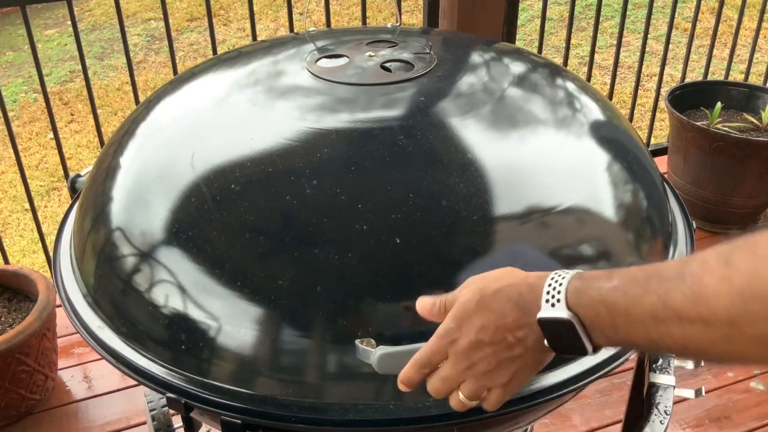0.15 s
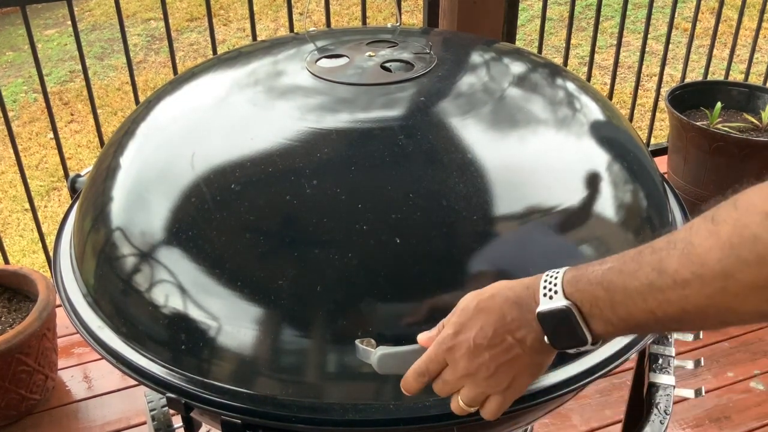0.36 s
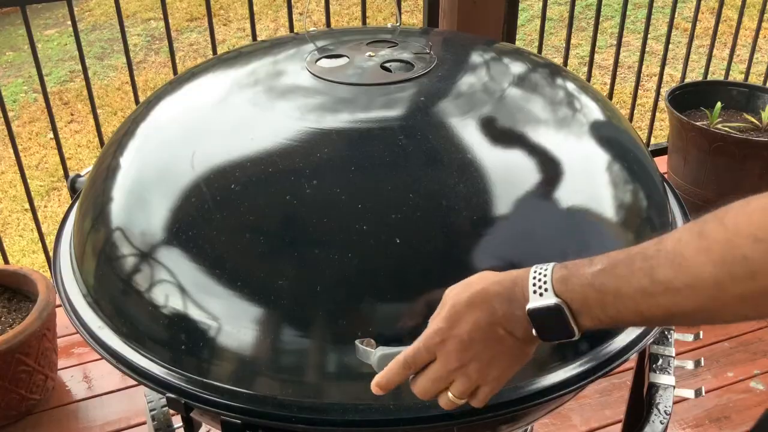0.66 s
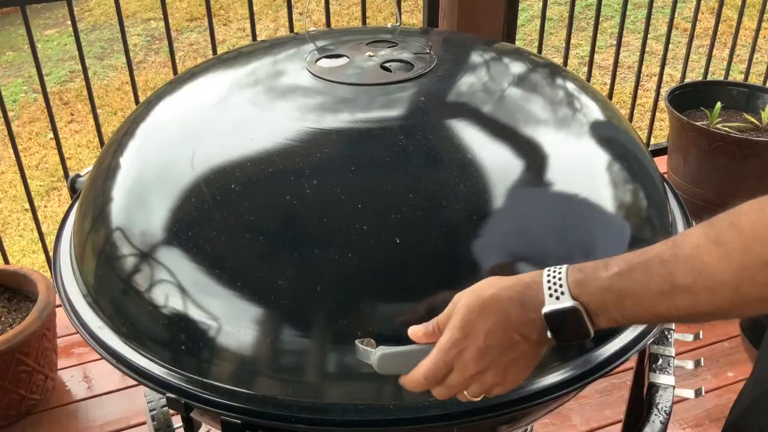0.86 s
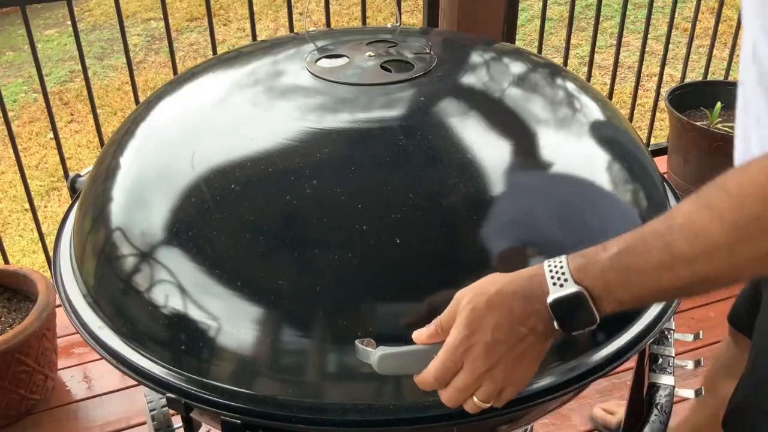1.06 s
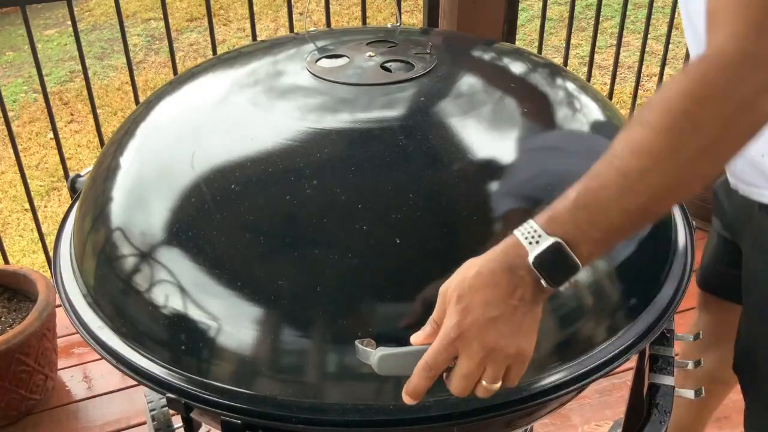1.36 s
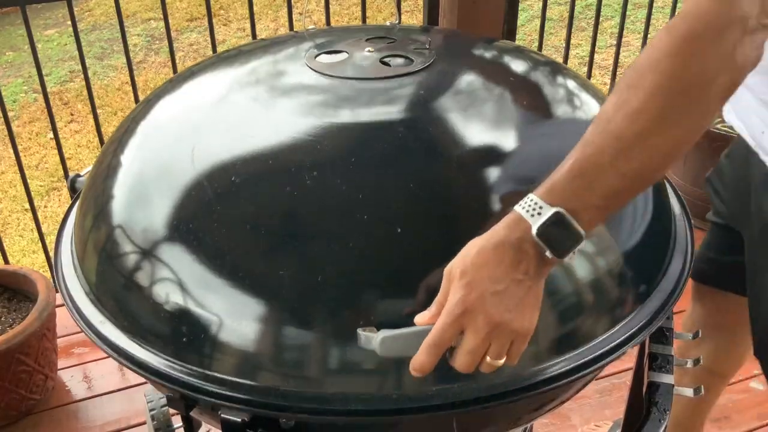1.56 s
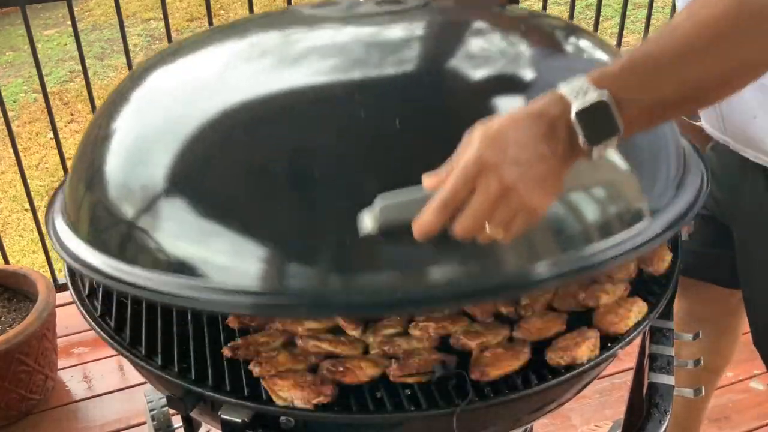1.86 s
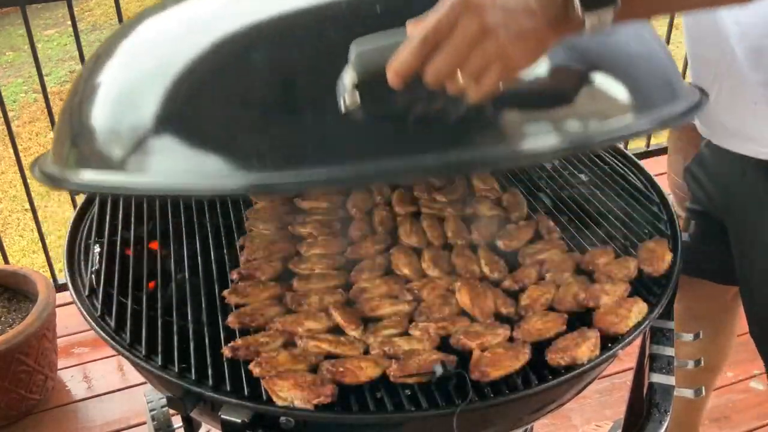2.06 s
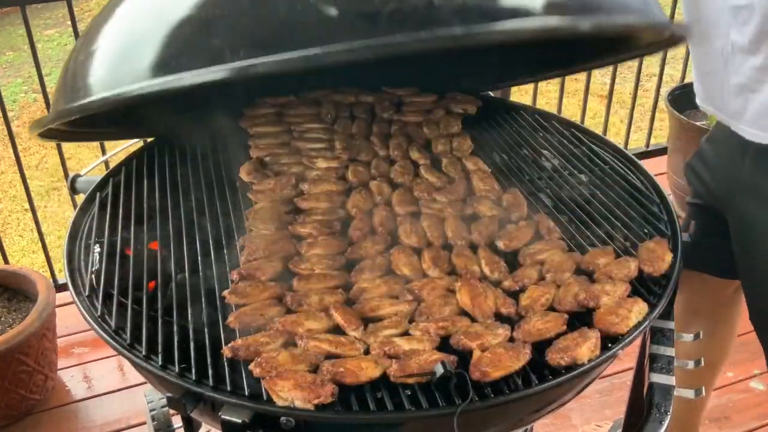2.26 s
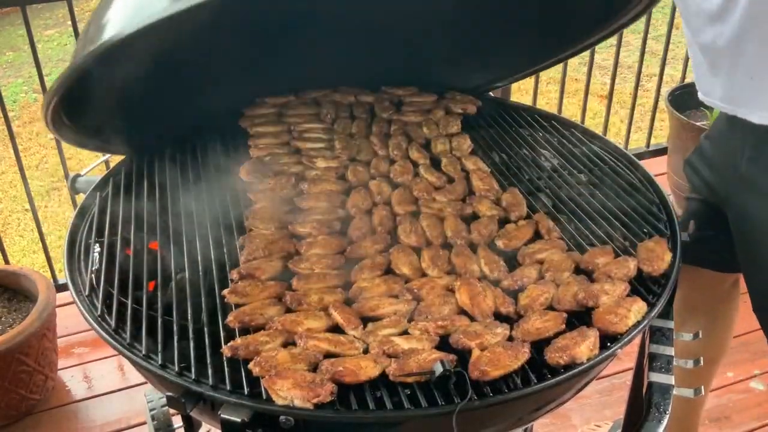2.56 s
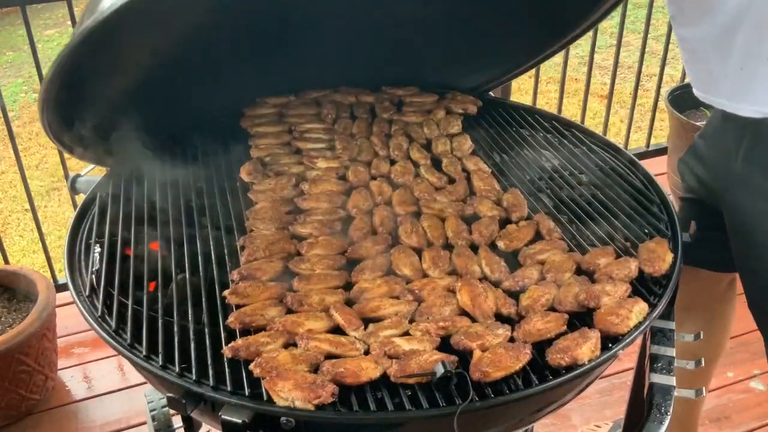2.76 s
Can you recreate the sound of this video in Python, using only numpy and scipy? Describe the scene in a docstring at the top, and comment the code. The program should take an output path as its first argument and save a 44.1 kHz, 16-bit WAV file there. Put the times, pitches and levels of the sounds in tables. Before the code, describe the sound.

A heavy enameled steel grill lid is lifted, clanking loudly twice and scraping on its rim outdoors

```python
"""The enamelled steel lid of a grill, swung open by a hand on its handle, is a sum of decaying modes.
Skin and cloth rub as friction noise and small parts tick as short noise bursts; then the lid clanks
twice on the bowl and slides on its rim, where friction feeds its modes.
Soft rain on a wet deck is filtered random noise: hiss over a low rumble. A stereo widening delays
the left channel in the treble and adds a diffuse part; the strongest peaks are clipped."""
import sys
import numpy as np
from scipy import signal
from scipy.fft import rfft, irfft, next_fast_len
from scipy.io import wavfile
from scipy.ndimage import uniform_filter1d

SR = 44100
rng = np.random.default_rng(int(sys.argv[2]) if len(sys.argv) > 2 else 0)


def natural_amplitude(level_db):
    """Convert a level in decibels to a linear amplitude factor, elementwise."""
    exponent = np.asarray(level_db, float) / 20
    return 10 ** exponent


def log_audio(samples):
    """Write samples as a 16-bit WAV file to the path given in sys.argv[1]."""
    # one column per channel
    frames = np.atleast_2d(samples).T
    # limit to full scale, then quantise
    limited = np.clip(frames, -1, 1)
    pcm = np.round(limited * 32767).astype(np.int16)
    wavfile.write(sys.argv[1], SR, pcm)


N = 127890  # samples

# Spectrum of the rain noise. Each row: frequency in Hz, relative density in dB per Hz.
RAIN_SPECTRUM = [(15, -18), (25, 4.5), (130, 2.5), (193, -14.5), (320, -9.5), (400, -18), (490, -14),
                 (1220, -23.5), (2820, -24), (3600, -30), (7700, -32), (10200, -36.5), (13000, -25),
                 (16000, -30.5)]
RAIN_DB, PATCHY_DB = -40, 1.1  # rms level; rms of its drift over time and frequency

# Bright ticks of small parts. Each row: start in seconds, level in dB, decay time t60 in seconds,
# spectral tilt in dB per octave.
TICK_EVENTS = [(0.0676, -38, 0.62, -1.5), (0.153, -31.5, 0.026, -5), (0.209, -35, 0.16, -5),
               (0.3587, -30, .03, 12), (0.5604, -32.5, 0.68, -1.5), (.6905, -36, .012, 6),
               (1.002, -42, 0.25, -0.5), (1.092, -36, 0.24, 8.5), (1.166, -34, 0.11, 13),
               (1.3181, -11, 0.012, -3), (1.321, -22, 0.2, -3), (1.614, -20.5, 0.21, 3),
               (1.6195, 3.5, 0.083, 23), (1.805, -44.5, 0.2, -4.5), (1.975, -39, 0.067, 2),
               (2.1938, -27, .3, 0.5), (2.2148, -11, 0.23, 9.5), (2.4889, -10, .1, 1),
               (2.579, -15, 0.13, 5)]
TICK_RISE_S, TICK_LOW_HZ = .0007, 1330

# Rubs of skin, cloth and rim. Each row: peak time in seconds, rise in seconds, fall in seconds,
# level in dB, spectral tilt in dB per octave.
RUB_STROKES = [(.15, 0.032, 0.072, -40, -1.4), (0.214, 0.046, 0.6, -51.5, 1), (0.511, 0.042, 0.14, -50, 5),
               (0.68, 0.025, 0.04, -34, -2.5), (.81, 0.07, 0.085, -45, 0),
               (1.121, 0.034, 0.18, -48.5, -0.5), (1.3, 0.0094, 0.049, -43.5, -2.5),
               (1.434, 0.052, 0.049, -22.5, -1.53), (1.728, 0.093, 0.036, -37.5, 3.5),
               (2.048, 0.034, 0.17, -49, -7.5), (2.431, 0.11, 0.079, -37.5, 3.5),
               (2.522, 0.084, 0.058, -26.5, 3), (2.72, 0.15, 0.14, -28, 3)]
# Resonant colour of the rubs. The single row: centre in Hz, width in Hz, boost in dB.
RUB_RESONANCE = (4620, 750, 5.4)
RUB_LOW_HZ = 750
GRIT_DB, CLUMP_DB = 1, 2.8  # mean boost of single grains; rms of the slower clumping

# Low modes struck by the blows. The two lowest rows, near 35 and 55 Hz, are a dull thump of the deck beneath;
# the rest are flexing modes of the steel shell. Each row: frequency in Hz, level in dB, t60 in seconds.
SHELL_MODES = [(34.8, -28, 1), (55, -11, 0.27), (122.2, -7, 0.31), (144.5, -2.5, 0.29), (170.4, -8.5, 0.38),
               (223, -12.5, 0.34), (301.2, 6, 0.12), (344.7, -4.5, 0.18)]
# Modes of the bowl. Each row: frequency in Hz, level in dB, t60 in seconds.
BOWL_MODES = [(640, -16.5, 1), (816, -7, 0.51), (878.5, 6, 0.3), (905, -0.5, 0.39), (928, -7, 0.85),
              (1557, -3, 0.32), (1652, -6, 0.49), (2159, 0, 0.34), (2550, 6, 0.14), (2745, -7, 0.31),
              (2827, -17, 0.41)]
# Modes of the lid. Each row: frequency in Hz, level in dB, t60 in seconds.
LID_MODES = [(459.4, -1, .22), (709.4, -7.5, 0.76), (730, -16.5, 0.45), (779.5, 1.5, 0.32),
             (804, -6.5, 0.52), (835, 0.5, 0.28), (898, -4, 0.16), (987, -5, 0.15), (1098, -7.5, 0.16),
             (1517, -13, 0.17), (2007, -21, 0.27), (2720, -28, 0.27)]
# Blows on the steel, sudden or softly swelling. Each row: start in seconds, rise in seconds, then
# the levels of shell, bowl, lid and clang in dB.
STEEL_BLOWS = [(.563, 0.002, -40.5, -59, -66, -37.5), (1.002, 0.00089, -47, -69, -55, -53),
               (1.42, 0.0087, -44, -39, -39.5, -31), (1.613, 0.0028, -64, -54, -57, -28),
               (1.628, 0.0065, -50, -47, -36, -35), (1.715, 0.02, -42, -65, -41, -39.5),
               (2.206, 0.0043, -57, -58, -43, -23.5), (2.217, 0.0035, -52, -30.5, -45, -24.5),
               (2.2325, 0.0024, -3, -13.5, -29, -6.5), (2.4525, 0.002, -10.5, -17, -12.5, -9),
               (2.5, 0.0084, -11.5, -21.5, -13.5, -16), (2.54, 0.0021, -25, -49, -18, -24.5),
               (2.63, 0.038, -15, -24, -24.5, -20.5), (2.705, 0.0083, -12, -26.5, -30, -19.5),
               (2.79, 0.014, -19, -54, -43, -27), (2.86, 0.058, -13.5, -48, -4.5, -19.5)]
SHORTEST_RISE_S = .0003
# A round shell splits each mode: relative strength of the twin, and the scale of its offset.
TWIN, TWIN_HZ = .28, 14

# Dense upper modes of the steel, heard as a clang. Each row: frequency in Hz, relative level in dB per Hz.
CLANG_SPECTRUM = [(60, -62), (300, -9.5), (600, -17.5), (900, -5), (1250, -13.5), (1800, -10), (2800, -9),
                  (3600, -17.5), (6000, -24.5), (16000, -52)]
# Decay of the clang, about which single modes scatter. Each row: frequency in Hz, t60 in seconds.
CLANG_DECAY = [(200, 0.47), (900, 0.42), (2500, 0.47), (5000, 0.28), (12000, 0.29)]
CLANG_MODES = 320
UNEVEN_DB, RATTLE_DB = 5, 1.5  # scale of the mode level scatter; rms of the rattle

# Modes of the handle bracket. Each row: frequency in Hz, level in dB, t60 in seconds.
HANDLE_MODES = [(315, -19, 1.2), (815, -6, .6), (855, 0, .55), (1001, -12, .5), (1672, -4, .42),
                (2200, -3, .28), (2546, -4, .3), (2789, -7, .3)]
# Taps on the handle bracket. Each row: start in seconds, level in dB.
HANDLE_TAPS = [(1.319, -51), (1.618, -30.5), (1.712, -42)]

# The lid slides along its rim and sings; the contact place favours modes near one pitch. Each row:
# peak time in seconds, rise in seconds, fall in seconds, level in dB, favoured pitch in Hz.
RIM_SLIDES = [(2.725, 0.05, 0.03, -11.5, 788), (2.755, 0.03, 0.05, -14.5, 850),
              (2.8, 0.048, 0.061, -17, 753)]
SLIDE_WAVER = .2  # uneven friction: share of slow chance in each mode
FAVOUR_DB = 22  # loss one octave away from the favoured pitch

# Diffuse part of the widening. Each row: frequency in Hz, level against the direct part in dB.
DIFFUSE_SHARE = [(100, -16), (400, -11), (700, -6), (1500, -4.5), (3000, -4), (3600, -2.5), (8000, -3),
                 (9500, -12), (10300, -24), (15000, -30)]
# Phase of the left channel. Each row: frequency in Hz, lead over the plain lag in radians.
LEFT_LEAD = [(0, 0), (500, 2.5), (950, 4.2), (1250, 2.1), (3100, 1.7), (4000, -1.2), (7000, -2.6),
             (16000, -2.6)]
LAG_S = 35 / 44100
CLIP, EDGE_HZ = 1.0, 15800  # overload amplitude; low-pass edge


def evened(x):
    """Normalization: scales a signal to rms 1."""
    return x / np.sqrt(np.mean(x ** 2) + 1e-20)


def read(points, hz):
    """Interpolation of a spectrum on a logarithmic frequency axis."""
    f, value = np.transpose(points)
    return np.interp(np.log(hz + 1), np.log(f + 1), value)


def add(mix, s, sound):
    """Superposition: mixes a sound in at a time in seconds."""
    part = mix[round(s * SR):][:len(sound)]
    part += sound[:len(part)]


def shaped(x, gain):
    """Linear filtering: multiplies the spectrum of the last axis by a gain law."""
    size = next_fast_len(x.shape[-1] + 4096)
    spectrum = rfft(x, size) * gain(np.fft.rfftfreq(size, 1 / SR))
    return irfft(spectrum, size)[..., :x.shape[-1]]


def tilted(x, tilt_db, low_hz):
    """Spectral tilt: slopes a noise about 4 kHz, cuts its bass and sets rms 1."""
    def gain(hz):
        slope = natural_amplitude(tilt_db * np.log2(hz / 4000 + 0.037))
        return slope * hz ** 2 / (hz ** 2 + low_hz ** 2)
    return evened(shaped(x, gain))


def rain():
    """Stationary random noise: a fixed spectrum of hiss and rumble with drifting patches."""
    frames, hz = N // 256 + 5, np.fft.rfftfreq(1024, 1 / SR)
    real, imag, patches = rng.standard_normal((frames, 513, 3)).T
    patches = uniform_filter1d(patches, size=12, axis=0)
    patches = evened(uniform_filter1d(patches, size=12, axis=1))
    level_db = read(RAIN_SPECTRUM, hz)[:, None] + PATCHY_DB * patches
    z = (real + 1j * imag) * natural_amplitude(level_db)
    return natural_amplitude(RAIN_DB) * evened(signal.istft(z, nperseg=1024, noverlap=768)[1][:N])


def ticks():
    """Impulsive excitation: a sudden bright crack with an exponentially dying, fizzy tail."""
    out, t = np.zeros(N), np.arange(SR // 4) / SR
    for s, db, t60, tilt_db in TICK_EVENTS:
        envelope = np.minimum(t / TICK_RISE_S, 1) * natural_amplitude(db - 60 * t / t60)
        add(out, s, envelope * tilted(rng.standard_normal(len(t)), tilt_db, TICK_LOW_HZ))
    return out


def rubs():
    """Dry friction: gritty, clumped noise under a bell-shaped stroke."""
    out, t = np.zeros(N), np.arange(-SR // 4, SR // 4) / SR
    for s, rise, fall, db, tilt_db in RUB_STROKES:
        grit = rng.standard_normal(len(t)) * natural_amplitude(GRIT_DB * rng.exponential(1, len(t)))
        clumps = evened(uniform_filter1d(rng.standard_normal(len(t)), size=130))
        grit *= natural_amplitude(CLUMP_DB * clumps)
        bell = np.exp(-(t / np.where(t < 0, rise, fall)) ** 2)
        stroke = natural_amplitude(db) * bell * tilted(grit, tilt_db, RUB_LOW_HZ)
        # The stroke starts 0.25 s ahead of its peak; what falls before time zero is dropped.
        skip = max(round((.25 - s) * SR), 0)
        add(out, max(s - .25, 0), stroke[skip:])
    centre_hz, width_hz, boost_db = RUB_RESONANCE
    return shaped(out, lambda hz: natural_amplitude(boost_db * np.exp(-((hz - centre_hz) / width_hz) ** 2)))


def ring(modes, t, rise):
    """Modal superposition: modes swell together, beat with split twins and die at their own speeds."""
    hz, db, t60 = np.transpose(modes)[:, :, None]
    off, turn = rng.uniform(-1.14, 1, (len(hz), 2, 1)).transpose(1, 0, 2)
    main = np.sin(2 * np.pi * hz * t)
    twin = TWIN * np.sin(2 * np.pi * (hz + TWIN_HZ * off) * t + np.pi * turn)
    decaying = natural_amplitude(db - 60 * t / t60) * (main + twin)
    return (1 - np.exp(-t / rise)) ** 2 * decaying.sum(0)


def steel():
    """Modal excitation: each blow sets shell, bowl and lid ringing by different amounts."""
    out, t = np.zeros(N), np.arange(SR // 3) / SR
    fade = np.cos(1.5 * np.pi * t) ** .5  # reaches silence after a third of a second
    for s, rise, shell_db, bowl_db, lid_db, _ in STEEL_BLOWS:
        rise = max(rise, SHORTEST_RISE_S)
        parts = ((shell_db, SHELL_MODES), (bowl_db, BOWL_MODES), (lid_db, LID_MODES))
        add(out, s, fade * sum(natural_amplitude(db) * ring(modes, t, rise) for db, modes in parts))
    return out


def clang(t, rise):
    """High modal density: a crowd of uneven modes at chance pitches, shaken by rattling contact."""
    place, loud, fade, turn = rng.random((CLANG_MODES, 4)).T[:, :, None]
    hz = 250 + 8000 * ((np.arange(CLANG_MODES)[:, None] + place) / CLANG_MODES) ** 1.5
    t60 = read(CLANG_DECAY, hz) * (.7 + .5 * fade)
    start_db = read(CLANG_SPECTRUM, hz) - UNEVEN_DB * np.log(loud + .05)
    db = start_db - 60 * t[::20] / t60  # the decay moves in steps of 20 samples
    envelopes = np.repeat(natural_amplitude(db), 20, axis=1)[:, :len(t)]
    phase = (2 * np.pi * (hz * t + turn)).astype(np.float32)
    x = (envelopes * np.sin(phase)).sum(0)
    x = x / np.sqrt(np.mean(x[:1000] ** 2))  # rms 1 at the onset
    rattle = natural_amplitude(RATTLE_DB * evened(uniform_filter1d(rng.standard_normal(len(t)), size=200)))
    return (1 - np.exp(-t / rise)) * np.cos(1.5 * np.pi * t) * rattle * x


def clangs():
    """Broadband modal response: the dense clang of each blow."""
    out, t = np.zeros(N), np.arange(SR // 3) / SR
    for s, rise, *_, db in STEEL_BLOWS:
        add(out, s, natural_amplitude(db) * clang(t, max(rise, SHORTEST_RISE_S)))
    return out


def handle():
    """Free vibration of a small bracket: thin clinks after each tap."""
    out, t = np.zeros(N), np.arange(SR // 2) / SR
    for s, db in HANDLE_TAPS:
        add(out, s, natural_amplitude(db) * ring(HANDLE_MODES, t, 0.0021))
    return out


def slides():
    """Friction-driven resonance: an uneven push feeds lid modes that swell and sink with the stroke."""
    out, t = np.zeros(N), np.arange(N) / SR
    hz, db, _ = np.transpose(LID_MODES)[:, :, None]
    chance = uniform_filter1d(rng.standard_normal((2, len(hz), N)), size=1500)
    real, imag = uniform_filter1d(chance, size=900)
    waver = 1 + SLIDE_WAVER * (evened(real) + 1j * evened(imag))
    for s, rise, fall, level_db, favoured_hz in RIM_SLIDES:
        stroke = np.exp(-((t - s) / np.where(t < s, rise, fall)) ** 2)
        near = stroke > 1e-4
        favour = natural_amplitude(db - FAVOUR_DB * abs(np.log2(hz / favoured_hz)) ** .5)
        modes = favour * waver[:, near] * np.exp(2j * np.pi * hz * (t[near] - s))
        out[near] += natural_amplitude(level_db) * stroke[near] * modes.real.sum(0)
    return out


def noisy_sources():
    """Random superposition: every call draws the rain, ticks, rubs and clangs afresh."""
    return rain() + ticks() + rubs() + clangs()


def scene():
    """Stereo widening: the channels share one part and get a diffuse part in opposite sign."""
    rings = steel() + handle() + slides()
    shared = rings + noisy_sources()
    diffuse = noisy_sources() + .8 * rings

    def share(hz):
        return 1j * natural_amplitude(read(DIFFUSE_SHARE, hz))  # a quarter turn from the shared part

    def norm(hz):
        return 1 / np.sqrt(1 + abs(share(hz)) ** 2)

    def lagging(hz):
        # The lead offsets the plain lag in the bass, so the left channel lags in the treble.
        lead = np.interp(hz, *np.transpose(LEFT_LEAD))
        return norm(hz) * np.exp(1j * (lead - 2 * np.pi * hz * LAG_S))

    diffuse = shaped(diffuse, share)
    return np.array([shaped(shared + diffuse, lagging), shaped(shared - diffuse, norm)])


def top_cut(x):
    """Nothing passes above the cut-off."""
    return signal.sosfilt(signal.butter(12, 16410, fs=SR, output="sos"), x)


def record(dry):
    """Band limitation and overload: a low-pass filter followed by hard clipping."""
    low_pass = signal.firwin(255, EDGE_HZ, window=("kaiser", 8), fs=SR)
    x = signal.oaconvolve(dry, low_pass[None], "same")
    mix = np.clip(x, -CLIP, CLIP)
    return top_cut(mix)


dry = scene()
out = record(dry)
log_audio(out)
```